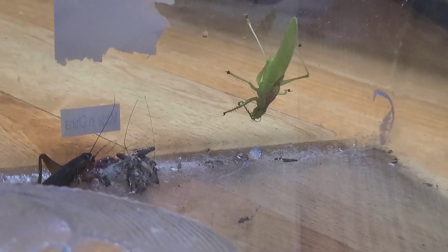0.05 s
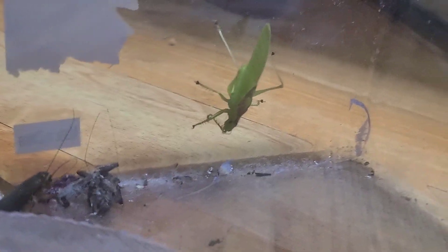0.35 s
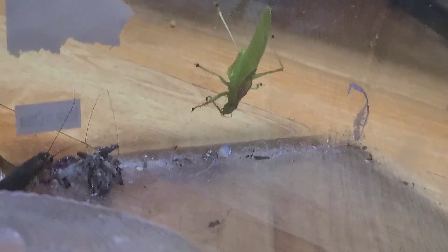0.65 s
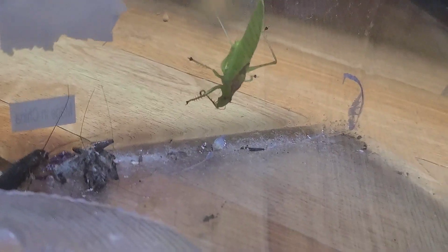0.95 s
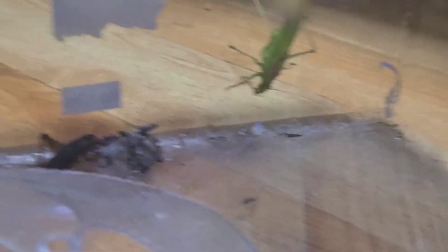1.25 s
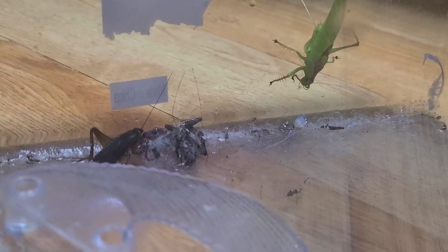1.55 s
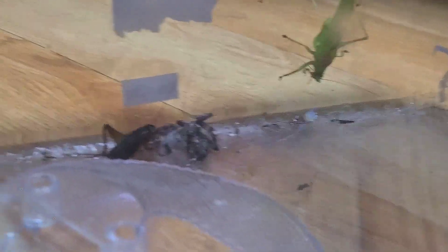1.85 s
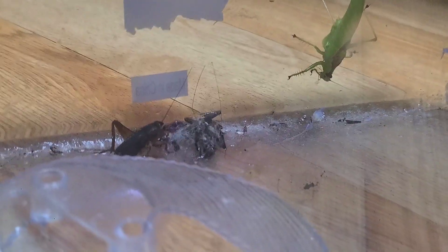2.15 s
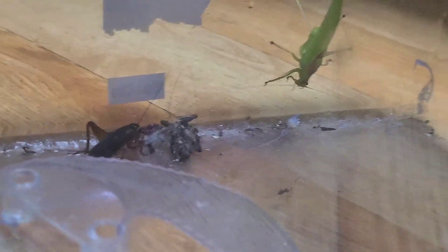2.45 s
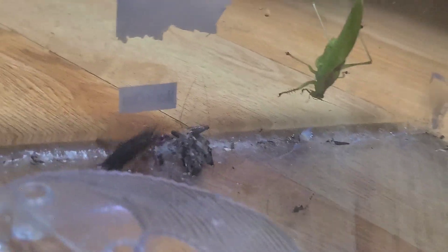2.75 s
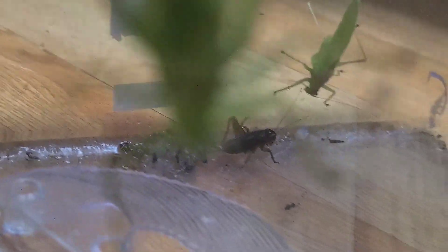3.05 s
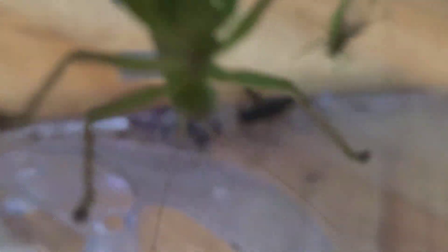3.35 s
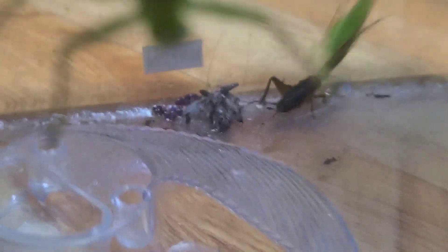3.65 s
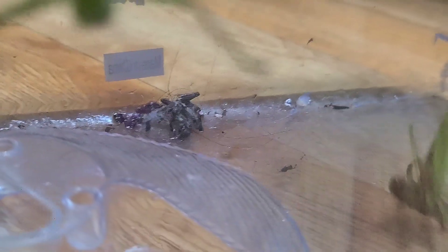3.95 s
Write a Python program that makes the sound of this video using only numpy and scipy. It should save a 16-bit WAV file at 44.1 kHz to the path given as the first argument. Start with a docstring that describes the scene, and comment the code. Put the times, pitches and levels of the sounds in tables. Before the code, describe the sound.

Insect claws tick and scratch on thin plastic, then a sharp knock, over a fan hum.

```python
"""Insects in a plastic box

Insects scrabble close by in a small plastic box, in a quiet room with a humming fan. They tap softly,
wings and legs brush the walls, and claws tick and scratch as they catch and let go. Their bodies bump
the thin panels, which flex and boom. A leap ends in a sharp knock and a lighter second one."""
import sys
import numpy as np
from scipy import signal
from scipy.fft import rfft, irfft, next_fast_len
from scipy.io import wavfile
from scipy.ndimage import map_coordinates

SR = 44100
rng = np.random.default_rng(int(sys.argv[2]) if len(sys.argv) > 2 else 0)


def dump_mix(stems):
    """Bounce the given channels to the path in sys.argv[1] as a 16-bit WAV at rate SR."""
    frames = np.atleast_2d(stems).T  # one column per channel
    limited = np.clip(frames, -1, 1)  # hard clip at full scale
    pcm = np.round(limited * 32767).astype(np.int16)
    wavfile.write(sys.argv[1], SR, pcm)


N = 176400
T = np.arange(SR // 2) / SR  # the half second that one hit is given [s]

# Air noise in the room: (frequency [Hz], level [dB])
AIR_TONE = [(35, -8.5), (70, -2), (250, -8.5), (410, -7.5), (740, -7), (960, -15.5), (1700, -12.5),
            (1980, -11.5), (2250, -17), (4600, -22.5), (7600, -30.5), (9000, -44), (12500, -40.5),
            (16000, -47.5)]
# The fan's steady tones: (pitch [Hz], level [dB])
FAN_HUM = [(61, -57.5), (120, -64.5), (161, -62.5)]
# How alike left and right are, for room and insects: (frequency [Hz], likeness [1 = the same])
ROOM_ALIKE = [(130, 0.91), (1400, 0.69), (3100, 0.064)]
NEAR_ALIKE = [(100, 0.96), (600, 1), (2000, -0.016), (6000, -0.028)]
# Which side is louder, for room and insects: (frequency [Hz], left minus right [dB])
ROOM_SIDE = [(60, -1), (1000, 1), (6000, -4)]
NEAR_SIDE = [(70, 1.5), (250, 8.5), (1400, 1.5), (3500, -5.5), (6500, -6), (15000, -2)]
# Soft, dull taps on the box: (time [s], level [dB], pitch [Hz])
TAPS = [(0.043, -36, 795), (0.652, -33.5, 856), (1.443, -33.5, 845), (1.571, -38.5, 970),
        (2.0066, -25, 1750), (2.441, -25, 1380)]
# Wings and legs brushing the wall: (time [s], level [dB], length [s], boosted pitch [Hz])
BRUSHES = [(0.402, -55, 0.53, 2100), (0.705, -51, 0.097, 6800), (2.755, -22, 0.046, 12800),
           (2.9089, -14.5, 0.046, 9350), (3.8191, -23, 0.058, 5740)]
# The rasp of rubbing on plastic: (frequency [Hz], level [dB])
RASP_TONE = [(150, 6), (950, -8.5), (2000, 1), (6500, -5), (9000, -15), (13000, -12), (16000, -30)]
# Claw ticks, and one light 1.5 kHz knock at 2.7574 s: (time [s], level [dB], pitch [Hz])
TICKS = [(0.6277, -41, 2100), (0.73, -50, 5900), (1.8245, -46, 6500), (1.844, -41, 5200),
         (2.3625, -25.5, 6800), (2.4219, -32.5, 2680), (2.44, -31, 2760), (2.4682, -31, 4780),
         (2.5157, -29, 4900), (2.5424, -25.5, 7400), (2.616, -31.5, 5050), (2.649, -31.5, 3670),
         (2.6688, -28, 3000), (2.700, -34, 5500), (2.7164, -31.5, 2350), (2.7574, -22, 1510),
         (2.7943, -29, 2240), (2.8091, -25, 2640), (2.831, -27.5, 2580), (2.868, -29, 3000),
         (2.9006, -15.5, 4430), (2.953, -26.5, 2210), (3.0065, -40.5, 3580), (3.022, -32, 3000),
         (3.04, -32.5, 2920), (3.222, -38, 4130), (3.49, -31.5, 2690), (3.5113, -36.5, 3970),
         (3.5964, -31.5, 4230), (3.6285, -27.5, 4290), (3.699, -33, 2030), (3.7878, -34.5, 2010),
         (3.854, -34.5, 6230), (3.872, -37, 2100), (3.945, -24, 2140), (3.9804, -36, 3650)]
# The click of a claw: (frequency [Hz], level [dB])
CLAW_TONE = [(1000, 7), (2200, 3), (7000, 9), (9000, 0), (13000, 2), (16000, 1)]
# Knocks, from a faint footfall to the hard landing: (time [s], level [dB], boosted pitch [Hz])
KNOCKS = [(2.311, -38, 2230), (3.8265, -6, 1680), (3.85, -23.5, 1300), (3.94, -18.5, 1010)]
# The notes of hard-struck plastic: (pitch [Hz], level [dB], ring time [s])
PLASTIC_NOTES = [(619, -18.5, 0.12), (1033, -17, 0.14), (1084, -7, 0.024), (1780, -17.5, 0.11),
                 (1875, 0, 0.021), (2083, -11.5, 0.041), (4030, -12.5, 0.023)]
# How the scratching swells and fades: (time [s], level [dB])
SCRATCH_LEVELS = [(2.32, -56), (2.41, -52.5), (2.45, -39), (2.59, -52), (2.66, -43.5), (2.77, -37),
                  (2.93, -39.5), (2.98, -48.5), (3.12, -64.5), (3.45, -60), (3.63, -51), (3.72, -53),
                  (3.84, -41), (3.89, -49.5)]
# Bodies bumping a wall: (time [s], level [dB], boosted pitch [Hz], ring time at 1 kHz [s])
BUMPS = [(2.76, -16.5, 101, 0.077), (2.911, -21, 456, 0.11), (2.996, -24.5, 87, 0.061),
         (3.063, -28, 86, 0.045), (3.8625, -24.5, 397, 0.041)]
# The notes of the thin wall as it flexes: (pitch [Hz], level [dB])
WALL_NOTES = [(70, -6.5), (120, -1), (190, -9.5), (328, -6.5), (424, -6), (462, -7), (535, -8),
              (1000, -5.5), (1420, 1), (1810, -2)]


def amp(db):
    """Turns decibels into a number to multiply by."""
    return 10 ** (np.asarray(db) / 20)


def unit(x):
    """Scales a sound to an average strength (rms) of 1."""
    return x / np.sqrt(np.mean(x ** 2) + 1e-20)


def along(points, hz):
    """Reads between the rows of a (frequency, value) table, on a musical scale."""
    freqs, values = np.transpose(points)
    return np.interp(np.log(hz + 1), np.log(freqs + 1), values)


def fade(ring_s):
    """A hit dies away, losing 60 dB over its ring time."""
    return np.exp(-np.log(1000) * T / ring_s)


def hump(hz, centre, octaves):
    """A smooth hump around one pitch."""
    return np.exp(-.5 * (np.log2((hz + 1) / centre) / octaves) ** 2)


def pan(db):
    """Left and right gains that differ by db."""
    return amp(np.array([db, -db]) / 2)


def noise(size, tone_db, alike=NEAR_ALIKE, side=NEAR_SIDE):
    """Stereo noise of strength 1 with a given tone, likeness and balance."""
    hz = np.fft.rfftfreq(size, 1 / SR)
    shared, apart = rfft(rng.standard_normal((2, size))) * amp(tone_db(hz))
    angle = np.arccos(np.clip(along(alike, hz), -1, 1)) / 2
    shared, apart = shared * np.cos(angle), apart * np.sin(angle)
    pair = np.array([shared + apart, shared - apart])
    return unit(irfft(pair * pan(along(side, hz)), size))


def burst(shape, tone_db):
    """A short noise whose loudness follows the given shape."""
    return unit(noise(len(T), tone_db) * shape) * np.sqrt(np.mean(shape ** 2))


def note(hz, ring_s, spread, blur_hz):
    """One ringing note, blurred by rattling; spread puts left and right out of step."""
    wander = np.cumsum(rng.standard_normal(len(T))) * np.sqrt(2 * np.pi * blur_hz / SR)
    phase = wander + spread * np.sqrt(hz / 1000) * np.array([[.5], [-.5]])
    return pan(along(NEAR_SIDE, hz))[:, None] * np.sin(2 * np.pi * hz * T + phase) * fade(ring_s)


def add(out, start, sound):
    """Mixes a sound in at its start time, in seconds."""
    i = round(start * SR)
    out[:, i:i + len(T)] += sound[:, :N - i]


def room(air_db=-49.5, left_lead_s=0.00031, waver=0.95, drifts_per_s=5):
    """A fan hums, wavering slightly, over steady air noise that reaches the left side first."""
    t = np.arange(N) / SR
    hum = np.zeros(N)
    for hz, db in FAN_HUM:
        drift = map_coordinates(rng.standard_normal(64), [t * drifts_per_s], mode="mirror")
        hum += np.sqrt(2) * amp(db) * np.sin(2 * np.pi * hz * t + waver * drift)
    left, right = noise(N, lambda hz: along(AIR_TONE, hz), ROOM_ALIKE, ROOM_SIDE)
    return hum + amp(air_db) * np.array([left, np.roll(right, round(left_lead_s * SR))])


def taps(push_s=0.0013, puff_db=-5, ring_s=0.017):
    """Soft touches that hardly ring: one push and a dull puff, with little above their pitch."""
    out = np.zeros((2, N))
    for start, db, pitch in TAPS:
        top_hz = 1.6 * pitch
        muffle = signal.butter(6, top_hz, fs=SR, output="sos")
        push = signal.sosfilt(muffle, (1 - T / push_s) * np.exp(-T / push_s))
        shape = (1 - np.exp(-T / push_s)) * fade(ring_s)
        puff = burst(shape, lambda hz: 10 * hump(hz, pitch, .5) - 20 * np.log10(1 + (hz / top_hz) ** 6))
        add(out, start, amp(db) * (push + amp(puff_db) * puff))
    return out


def brushes(rise_share=0.07, boost_db=8):
    """A wing or leg sweeps along the wall; a longer sweep also swells more slowly."""
    out = np.zeros((2, N))
    for start, db, length, pitch in BRUSHES:
        shape = np.minimum(T / (rise_share * length), 1) * fade(length)
        sweep = burst(shape, lambda hz: along(RASP_TONE, hz) + boost_db * hump(hz, pitch, 0.61))
        add(out, start, amp(db) * sweep)
    return out


def box_echo(sound, echo_db=-12, ring_s=0.07):
    """The close walls add a short, hollow echo to a sound."""
    echo = rng.standard_normal((2, len(T))) * fade(ring_s)
    echo /= np.linalg.norm(echo[0])
    return sound + amp(echo_db) * signal.fftconvolve(sound, echo, axes=1)[:, :N]


def ticks(gain_db=-3, boost_db=10, rise_s=0.0018, click_s=0.0077):
    """A claw snaps off the plastic, or a light knock sounds: a hard click and a very short ring at the pitch of
    that spot."""
    out = np.zeros((2, N))
    rise = np.minimum(T / rise_s, 1) ** 3
    snap = rise * fade(click_s)
    for start, db, pitch in TICKS:
        click = burst(snap / snap.max(), lambda hz: along(CLAW_TONE, hz) + boost_db * hump(hz, pitch, 1))
        ring = rise * note(pitch, ring_s=0.0045, spread=0.16, blur_hz=58.3)
        add(out, start, amp(db + gain_db) * (click + ring / abs(ring).max()))
    return out


def knocks(rise_s=0.0014, crack_s=0.04, crack_db=-9):
    """A hard body hits the plastic: a noisy crack, two loud, short notes and fainter ones that ring on."""
    out = np.zeros((2, N))
    rise = 1 - np.exp(-T / rise_s)
    for start, db, pitch in KNOCKS:
        ring = sum(amp(level) * (hump(hz, pitch, 0.92) + 0.36) * note(hz, ring_s, spread=0.79, blur_hz=12)
                   for hz, level, ring_s in PLASTIC_NOTES)
        crack = burst(fade(crack_s), lambda hz: along([(120, -13), (4000, 8.5), (9000, -13)], hz))
        add(out, start, amp(db) * rise * (ring + amp(crack_db) * crack))
    return out


def scratching(catches_per_s=550, scatter_db=5, grain_s=0.00091, slide=0.35):
    """Legs slip over the floor in a crowd of tiny catches, with a little smooth sliding between them."""
    catches = rng.random(N) < catches_per_s / SR
    strengths = amp(scatter_db * np.clip(rng.standard_normal(N), -2, 2))
    grains = unit(signal.fftconvolve(catches * strengths, np.exp(-T / grain_s))[:N])
    rasp = noise(N, lambda hz: along(RASP_TONE, hz))
    level_db = np.interp(np.arange(N) / SR, *np.transpose(SCRATCH_LEVELS), left=-np.inf)
    return amp(level_db) * unit((grains + slide) * rasp)


def bumps(rise_cycles=0.42, thud_db=-14, thud_top_hz=2000):
    """A body bumps the wall, which flexes and booms; each bump brings out the notes near its pitch."""
    out = np.zeros((2, N))
    for start, db, pitch, ring_s in BUMPS:
        def weight(hz):
            trim_ends = 1 + (hz / (pitch * 10)) ** 2 + (pitch / (4 * hz + 1)) ** 4
            return (hump(hz, pitch, 0.28) + 0.66) / trim_ends

        ring = 0
        for hz, level in WALL_NOTES:
            life_s = ring_s * (1000 / hz) ** 0.45  # higher notes die sooner
            ring += amp(level) * weight(hz) * note(hz, life_s, spread=1, blur_hz=3)
        thud = burst(fade(ring_s), lambda hz: 20 * np.log10(weight(hz) / (1 + (hz / thud_top_hz) ** 2)))
        rise = 1 - np.exp(-T * pitch / rise_cycles)
        add(out, start, amp(db) * rise * (ring + amp(thud_db) * thud))
    return out


def scene():
    """The insects in their box, over the sound of the room."""
    return room() + box_echo(scratching() + ticks() + brushes()) + taps() + bumps() + knocks()


def record(dry):
    """Cuts away the very highest treble, above 16 kHz."""
    size = next_fast_len(N + SR // 2)
    kept = np.fft.rfftfreq(size, 1 / SR) < 16000
    return irfft(rfft(dry, size) * kept, size)[:, :N]


dry = scene()
out = record(dry)
dump_mix(out)
```